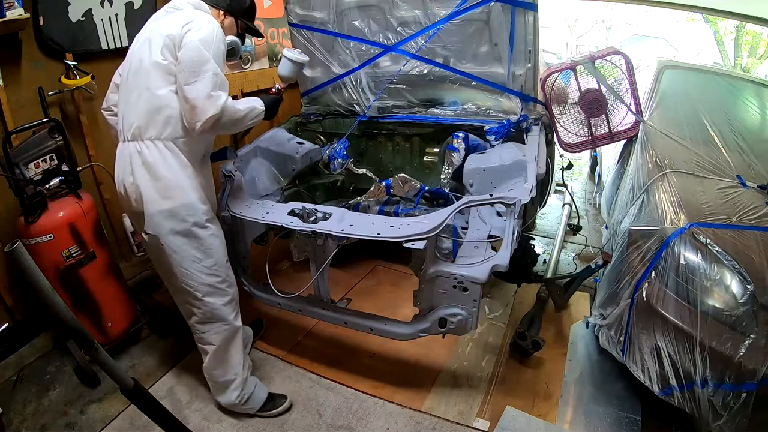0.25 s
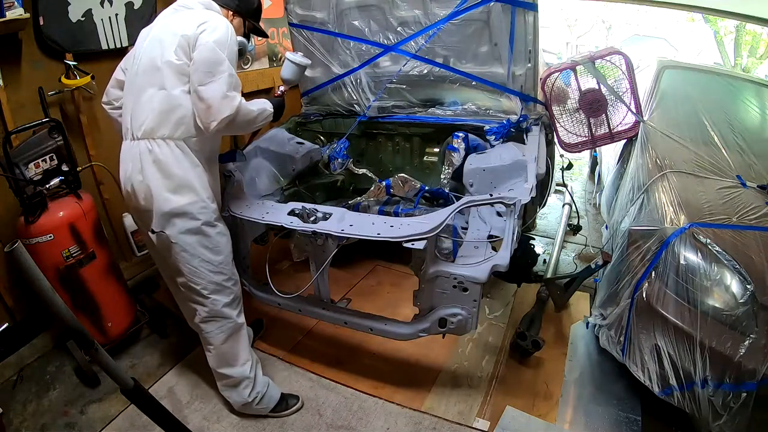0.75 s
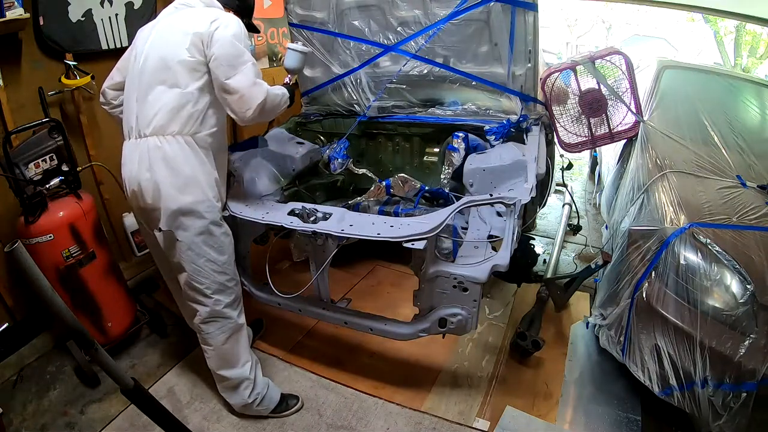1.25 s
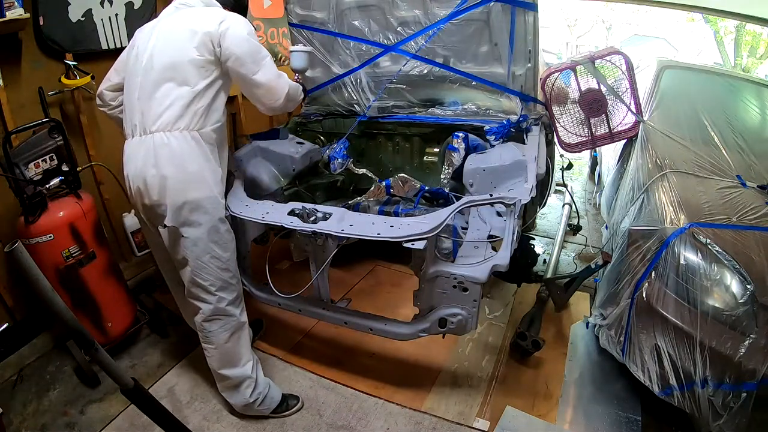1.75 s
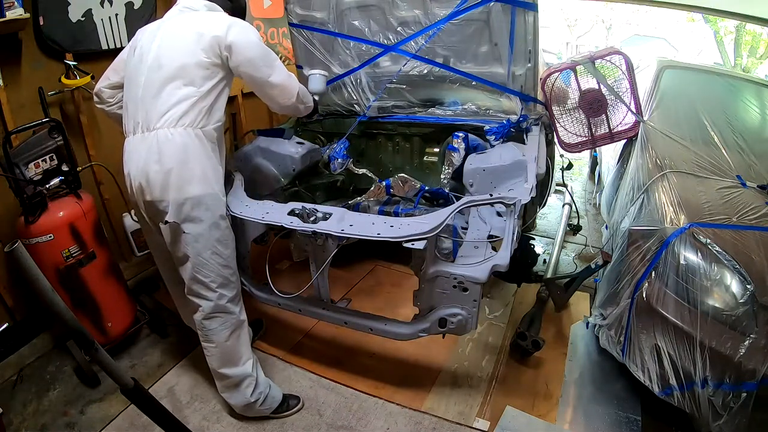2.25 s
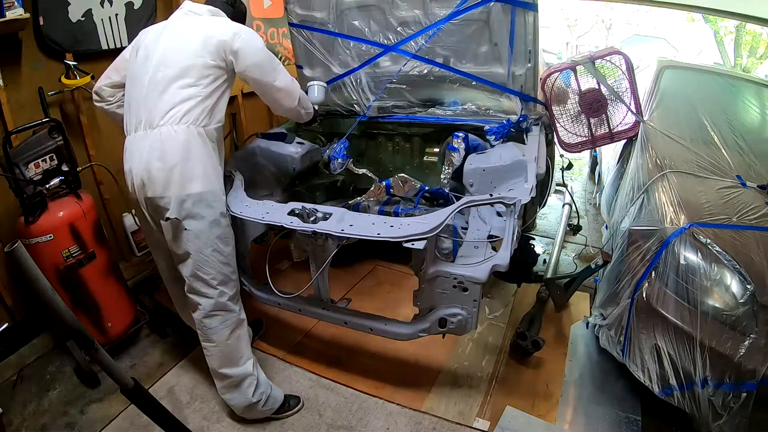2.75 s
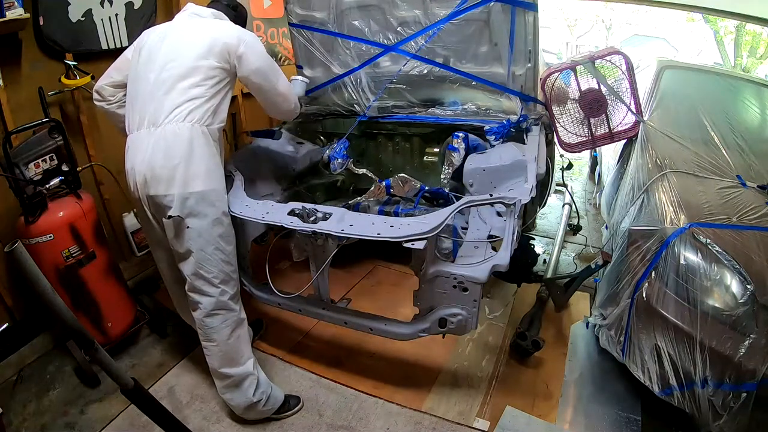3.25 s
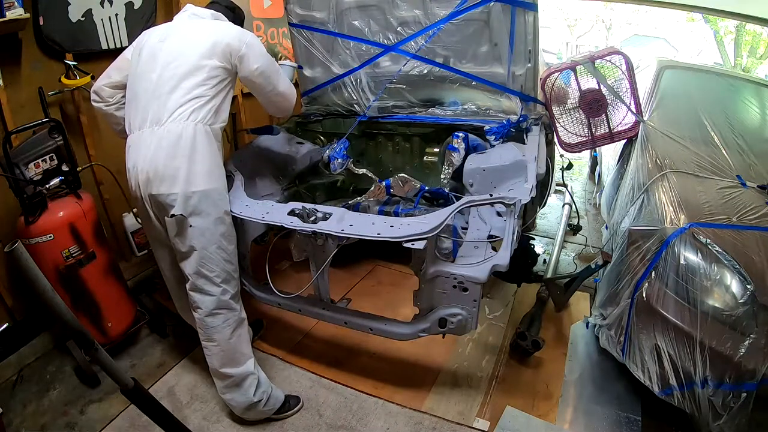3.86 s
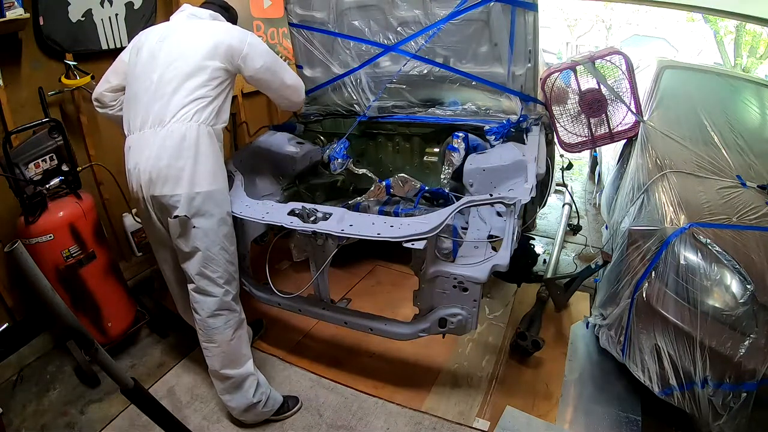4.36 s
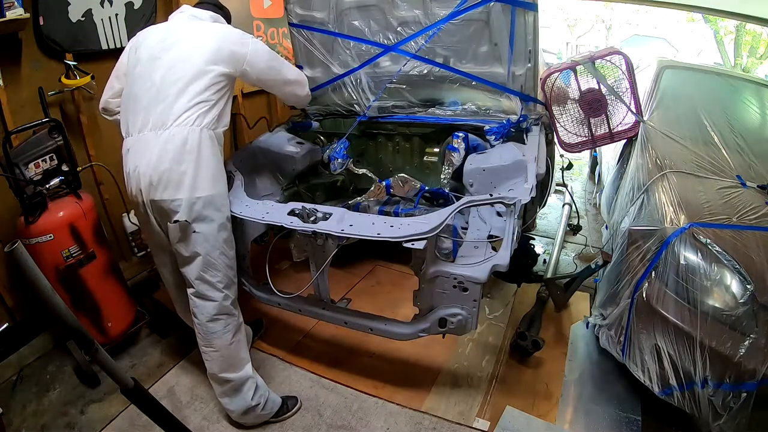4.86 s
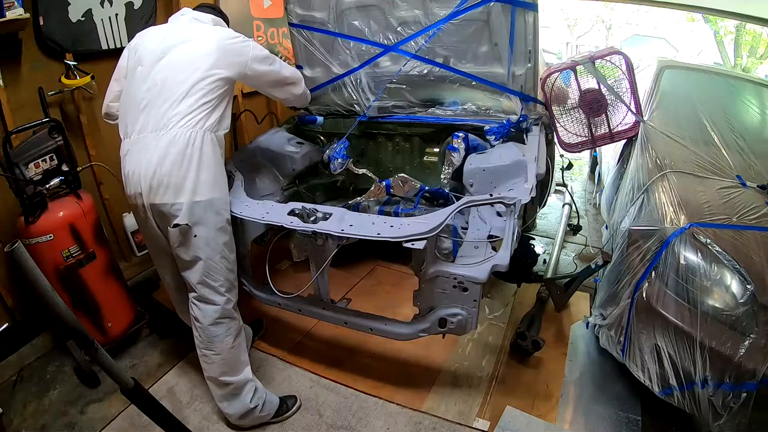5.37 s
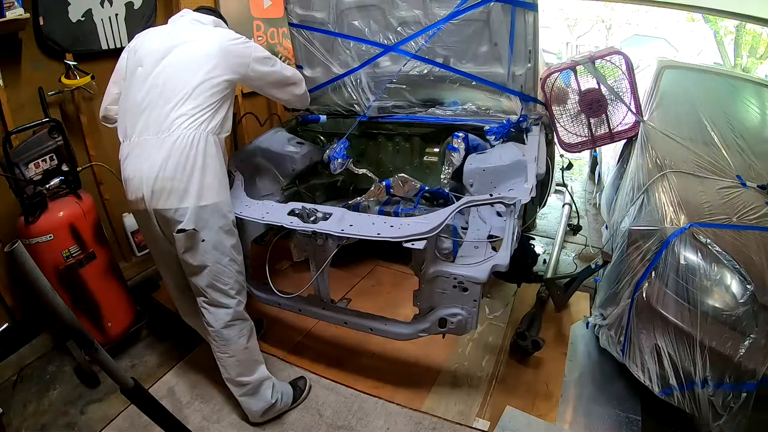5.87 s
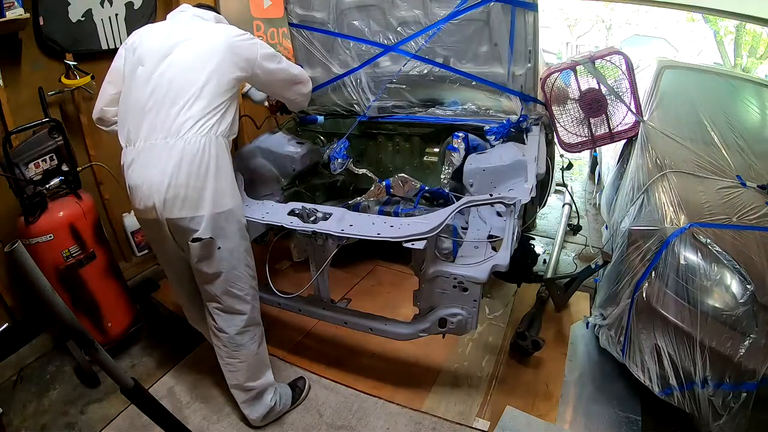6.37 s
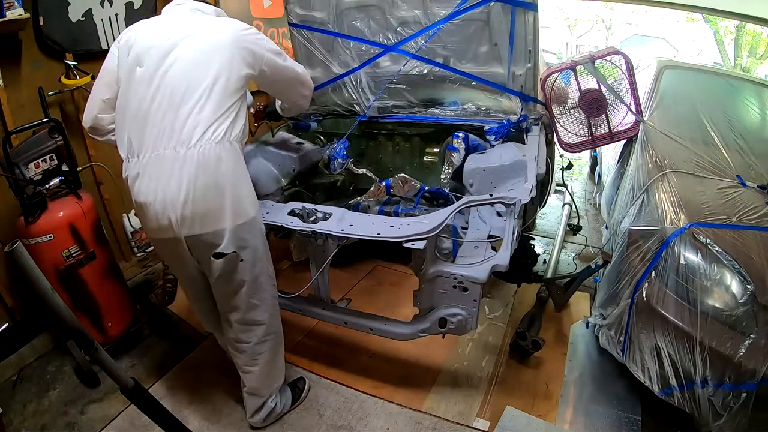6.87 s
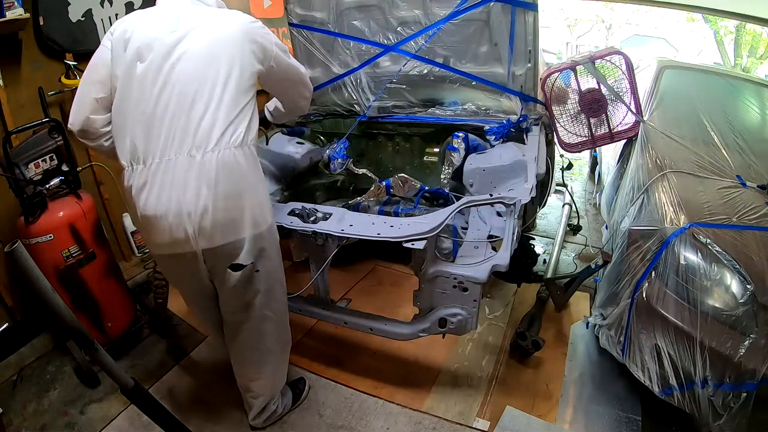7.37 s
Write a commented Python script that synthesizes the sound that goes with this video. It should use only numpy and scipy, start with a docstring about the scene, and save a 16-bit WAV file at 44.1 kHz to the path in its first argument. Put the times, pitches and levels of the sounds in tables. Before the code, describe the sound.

A small piston compressor drones loudly and steadily in a garage while a spray gun hisses in short bursts, ending with a sharp knock.

```python
"""A small piston compressor drones in a garage, 58 strokes a second: a sum of shaft orders and a valve-slap waveform.
Resonant bands rattle on each stroke; its cooling air is shaped noise. A painter leaning over a car shifts the
room's standing waves, screens the compressor and echoes it. His spray gun gives short bursts of turbulent noise.
Footfalls rock the microphone mount; a knock rings the microphone housing, and the sound breaks off."""
import sys
import numpy as np
from scipy import signal
from scipy.fft import rfft, irfft
from scipy.io import wavfile

SR = 44100
rng = np.random.default_rng(int(sys.argv[2]) if len(sys.argv) > 2 else 0)


def wav_record(signal):
    """Record a signal, one row per channel, as 16-bit PCM in the file named by sys.argv[1]."""
    frames = np.transpose(np.atleast_2d(signal))
    bounded = np.clip(frames, -1, 1)
    # unit amplitude maps onto the largest positive 16-bit level
    quanta = np.round(bounded * 32767).astype(np.int16)
    wavfile.write(sys.argv[1], SR, quanta)


N = 336038
TIME = np.arange(N) / SR
CUTOFF_HZ = 15500
SOUND_M_PER_S = 343

# strong multiples of the shaft speed: order, rms level/dB before the left-right lean and the painter
SHAFT_ORDERS = [(1, -24), (2, -31.5), (3, -27), (4, -26.5), (5, -35.5), (6, -29), (7, -35.5), (8, -39),
                (9, -25), (10, -21.5), (11, -27.5), (12, -31.5), (13, -29), (14, -34.5), (15, -35.5),
                (16, -37.5), (17, -43.5), (18, -50.5), (19, -47), (20, -54), (21, -55.5), (22, -42.5),
                (23, -42.5), (24, -42.5), (25, -47), (26, -43.5), (27, -58), (28, -47), (29, -56.5),
                (30, -60), (31, -39.5), (32, -46.5), (34, -44.5), (38, -43.5), (39, -41), (41, -53.5),
                (45, -48.5), (50, -54), (52, -68), (59, -52.5), (63, -53), (64, -52), (77, -54.5),
                (81, -53)]
# correlation of the compressor's sound at the two ears: f/Hz, correlation (-1 to 1)
EAR_CORRELATION = [(60, 0.89), (300, 1), (500, 1), (800, 0.53), (1200, 0.37), (3300, 0.78), (5500, 0.11),
                   (9000, -0.61), (15000, 0.041)]
STROKE_AT = .531   # point in each turn when the exhaust valve opens (turns)


def from_db(db):
    """A level in decibels is twenty times the logarithm of an amplitude ratio."""
    return 10 ** (np.asarray(db) / 20)


def rms_one(x):
    """Dividing by the root mean square gives unit effective value."""
    return x / np.sqrt(np.mean(x ** 2) + 1e-20)


def in_time(rows):
    """Linear interpolation turns each column of a time table into a curve, sample by sample."""
    s, *columns = np.transpose(rows)
    return [np.interp(TIME, s, column) for column in columns]


def at_hz(points, hz):
    """A spectrum is interpolated on a logarithmic frequency axis."""
    table_hz, values = np.array(points)[:, 0], np.array(points)[:, 1]
    return np.interp(np.log(np.maximum(hz, 1)), np.log(table_hz), values)


def ramp(start, length):
    """A linear transition rises from 0 to 1 (start and length in s)."""
    return np.clip((TIME - start) / length, 0, 1)


def drift(rate):
    """White noise through a two-pole low-pass at rate (Hz) wanders slowly, with spread 1."""
    step = 40   # samples per point of the slow signal
    pole = np.exp(-2 * np.pi * rate * step / SR)
    noise = rng.standard_normal(N // step + 2002)
    slow = signal.lfilter([1], [1, -2 * pole, pole * pole], noise)[2000:]   # without the onset
    return np.interp(np.arange(N) / step, np.arange(len(slow)), rms_one(slow))


def two_ears(mid, side, likeness):
    """Sum and difference of two uncorrelated signals give a prescribed interaural correlation."""
    alike = np.clip(likeness, -1, 1)
    mid = np.sqrt((1 + alike) / 2) * mid
    side = np.sqrt((1 - alike) / 2) * side
    return np.array([mid + side, mid - side])


def ear_gains(lean_db):
    """An interaural level difference is shared equally: half up on the left, half down on the right."""
    return from_db(np.outer([1, -1], lean_db) / 2)


def compressor_gains(hz):
    """The interaural level difference of the compressor varies with frequency."""
    # level difference between the ears: f/Hz, left minus right/dB
    level_difference = [(60, 1), (115, -.8), (230, 0), (350, .3), (520, .5), (600, 3.3), (1200, 5.5),
                        (1900, 4), (3300, 2.5), (5500, 0), (9000, -1), (15000, .5)]
    return ear_gains(at_hz(level_difference, hz))


def air_noise(spectrum, likeness):
    """Turbulence is random noise with a prescribed spectral density (dB per Hz) and interaural correlation."""
    # level difference of moving air between the ears: f/Hz, left minus right/dB
    air_difference = [(60, -2), (150, -1.5), (450, -2), (800, 3.5), (1300, 7.5), (3000, 3), (6000, 0),
                      (12000, 0)]
    hz = np.fft.rfftfreq(N, 1 / SR)
    ears = two_ears(*rfft(rng.standard_normal((2, N))), at_hz(likeness, hz))
    shaped = ears * ear_gains(at_hz(air_difference, hz)) * from_db(at_hz(spectrum, hz))
    return irfft(shaped, N) * np.sqrt(SR / 2)


def in_shadow():
    """Acoustic shadow: how fully the painter's body screens the compressor, 0-1."""
    enters_s, leaves_s, crossing_s = 4.15, 5.93, .32
    entering = ramp(enters_s - crossing_s / 2, crossing_s)
    leaving = ramp(leaves_s - crossing_s / 2, crossing_s)
    return entering - leaving


def body_echo():
    """Reflection with a changing path: strength (0-1) and delay (s) of the echo off the moving painter."""
    # the painter's moves: start t/s, end t/s, extra path at start/m, path change/(m/s)
    body_moves = [(2.4, 4.4, 3.1, -1.62), (5.3, 6.3, .44, .8)]
    strength, delay = np.zeros(N), np.zeros(N)
    for start, end, path_m, m_per_s in body_moves:
        strength += np.sin(np.pi * ramp(start, end - start) ** 2)
        extra_m = np.maximum(path_m + m_per_s * (TIME - start), 0)
        delay = np.where(TIME > start, extra_m / SOUND_M_PER_S, delay)
    return strength, delay


def shaft_turns():
    """Rotation is the integral of speed; motor slip behind the mains makes it hunt at twice the slip."""
    # compressor shaft speed before unevenness and hunting: t/s, speed/(turns per s)
    shaft_speed = [(0, 58.01), (1.2, 58.0), (4, 58.03), (7.4, 58.065)]
    mains_hz, hunt_turns = 60, .0013
    speed, = in_time(shaft_speed)
    turns = np.cumsum(speed) / SR + .0003 * drift(23)   # the shaft runs slightly unevenly
    return turns + hunt_turns * np.sin(2 * np.pi * 2 * (mains_hz * TIME - turns))


def drone(turns, waver, right_lag_s, count=16):
    """Fourier synthesis of the low orders: resonant phase lag spreads each stroke, standing waves shift them."""
    # resonances of room, tank and pump head that ring on after a stroke: f/Hz, width/Hz
    resonances = [(30, 311), (114.4, 12), (251, 12.4), (527, 40)]
    # orders on standing waves: order, gain fully bent/dB, gain in shadow/dB (both before
    # the swell is set to unit rms), body echo/dB
    standing_waves = [(5, -1.7, 1.6, -14), (6, 1.6, .4, -17), (7, 7, -.4, -17), (8, -.5, 1.9, -10),
                      (9, -.9, .9, -11), (10, .9, .3, -26), (11, -4, -4.2, -14), (12, -1.2, -2.4, -11),
                      (13, .5, -3.4, -18), (14, 1.3, 5.5, -12), (15, -1.6, -7.1, -12), (16, 0, 2.7, -13)]
    bend_from_s, bend_to_s = 1.8, 6.7   # the painter bends ever further over the car
    out, shaft_hz = np.zeros((2, N)), turns[-1] / TIME[-1]
    standing = {order: gains for order, *gains in standing_waves}
    bent, shadow = ramp(bend_from_s, bend_to_s - bend_from_s), in_shadow()
    moving, echo_s = body_echo()
    for k, (_, level_db) in enumerate(SHAFT_ORDERS[:count], 1):
        hz, height = k * shaft_hz, k / count
        lag = sum(2 * np.arctan2(width * hz, ring_hz ** 2 - hz ** 2) for ring_hz, width in resonances)
        bent_db, shadow_db, echo_db = standing.get(k, (0, 0, -np.inf))   # the longest waves pass him by
        swell = rms_one(from_db(bent_db * bent + shadow_db * shadow))
        angle = 2 * np.pi * k * (turns - STROKE_AT) - lag + waver * height * drift(0.46)
        # short waves go the long way round the painter to the right ear
        detour_angle = np.pi * hz * right_lag_s * (1 + shadow / 2) * height ** 2
        between_ears = detour_angle + waver * height / 2 * drift(0.99)
        angle = angle + np.outer([1, -1], between_ears)
        echo = from_db(echo_db) * moving * np.cos(angle - 2 * np.pi * hz * echo_s)
        wave = np.cos(angle) + echo
        out += np.sqrt(2) * from_db(level_db) * swell * compressor_gains(hz) * wave
    return out


def buzz(turns, shifting, scatter_hz, count=16, size=4096):
    """A periodic valve slap has high harmonics; diffuse scattering randomizes their phase toward the treble."""
    # weaker orders, each then varied at random by 4 dB: f/Hz, rms level of one order/dB
    weak_orders = [(1900, -53.5), (2500, -60), (3600, -62.5), (5000, -67), (6300, -71.5), (7250, -67),
                   (8300, -77.5), (9250, -61), (10300, -73), (11000, -92.5)]
    orders = np.arange(size // 2 + 1)
    hz = orders * turns[-1] / TIME[-1]
    level_db = at_hz(weak_orders, hz) + rng.normal(0, 4.0, len(hz))
    for order, db in SHAFT_ORDERS:
        level_db[round(order)] = db
    in_band = (orders > count) * (hz < CUTOFF_HZ)
    spectrum = from_db(level_db) * compressor_gains(hz) * in_band * size / np.sqrt(2)
    apart = np.arccos(np.clip(at_hz(EAR_CORRELATION, hz), -1, 1))   # phase between the ears
    out = np.zeros((2, N))
    # the direct slap, and three diffuse echoes that come and go slowly
    paths = [(0.9, (hz / scatter_hz) ** 2)] + [(shifting * drift(2.2), np.pi) for _ in range(3)]
    for weight, scatter in paths:
        angle = scatter * rng.standard_normal(len(hz)) - 2 * np.pi * orders * STROKE_AT
        ears = np.outer([.5, -.5], apart * rng.choice([-1, 1], len(hz)))
        cycles = irfft(spectrum * np.exp(1j * (angle + ears)))
        # one stored cycle per ear is read at the shaft's position
        out += weight * np.array([np.interp(turns % 1 * size, np.arange(size), c) for c in cycles])
    return out / np.sqrt(1 + 3 * shifting ** 2)


def band_pass(x, hz, width):
    """A first-order resonant band passes its centre unchanged."""
    band = signal.butter(1, [hz - width / 2, hz + width / 2], "band", fs=SR, output="sos")
    return signal.sosfilt(band, x)


def rattle(turns, throb, uneven_db, flutter_db):
    """Forced resonance: stroke-pulsed noise rings valve reeds and housing in narrow bands, harder in fits."""
    # valve and housing bands: f/Hz, width/Hz, rms level/dB before rest trim, fits and lean, ear correlation
    rattle_bands = [(1850, 120, -48, 0.39), (2065, 174, -42.5, 0.87), (7230, 170, -51, -0.64),
                    (9100, 210, -50.5, -0.17), (9430, 490, -51, -0.21)]
    # fits of rattling: t/s, half length to 1/e/s, rise toward the low bands/dB, rise of the top band/dB
    rattle_fits = [(4.07, 0.073, -1, 5.5), (6.148, .07, 6, 5), (7.143, 0.14, 0.5, 11.5)]
    rest_db = -2.1   # trim of the top band, less for lower ones
    out = np.zeros((2, N))
    pulse = 1 + throb * np.cos(2 * np.pi * (turns - .88))
    shake = rms_one(pulse * from_db(uneven_db * drift(45)))
    for hz, width, level_db, likeness in rattle_bands:
        height = hz / rattle_bands[-1][0]
        flutter = from_db(flutter_db * height * drift(13))
        kicks = shake * flutter * two_ears(*rng.standard_normal((2, N)), likeness)
        ringing = rms_one(band_pass(band_pass(kicks, hz, width), hz, width))
        fits_db = sum((low_db + (high_db - low_db) * height ** 2) * np.exp(-((TIME - s) / length) ** 2)
                      for s, length, low_db, high_db in rattle_fits)
        out += from_db(level_db + rest_db * height + fits_db) * compressor_gains(hz) * ringing
    return out


def rush(turns, throb):
    """Amplitude modulation: the turbulence of cooling and intake air pulses with the piston."""
    # spectral density before ear lean and pulsing: f/Hz, level/dB per Hz
    cooling_air = [(30, -70.5), (100, -65.5), (300, -68.5), (550, -64), (800, -67), (1100, -72.5),
                   (1700, -70.5), (2500, -78.5), (3700, -78), (5000, -82), (6000, -86), (9500, -85),
                   (10800, -100), (11900, -94), (13200, -104), (15500, -108)]
    return air_noise(cooling_air, EAR_CORRELATION) * (1 + throb * np.cos(2 * np.pi * (turns - .6)))


def round_painter(x):
    """Interference: waves passing either side of the body add up in one band and cancel in the next."""
    # bands the detour lifts or cancels: f/Hz, width/Hz, gain in full shadow/dB
    detour_bands = [(1010, 125, 4.5), (1450, 280, -2.5)]
    shadow = in_shadow()
    out = x
    for hz, width, gain_db in detour_bands:
        out = out + (from_db(gain_db * shadow) - 1) * band_pass(x, hz, width)
    return out


def near_echo(x, low_hz, left_s, right_s):
    """Reflection: a small surface returns only short waves, later to one ear than to the other."""
    # a surface nearing the microphone: t/s, echo level/dB
    nearing_surface = [(6.7, -34), (7.05, -20), (7.3, -11), (7.53, -8)]
    bright = signal.sosfilt(signal.butter(2, [low_hz, 5000], "band", fs=SR, output="sos"), x)
    late = [np.interp(TIME - delay, TIME, ear) for delay, ear in zip((left_s, right_s), bright)]
    return from_db(in_time(nearing_surface)[0]) * np.array(late)


def spray_gun(flutter_db, likeness):
    """Jet noise: stored pressure spits out as the trigger opens, then the jet settles to a smooth hiss."""
    # spectral density before the trigger gains: f/Hz, level/dB per Hz
    jet_spectrum = [(1000, -90), (3000, -83), (5000, -82.5), (7000, -78), (9000, -81.5), (11500, -84.5),
                    (13000, -90), (15000, -100)]
    # trigger pulls: opens t/s, closes t/s, initial jet gain/dB, opening spit gain/dB
    trigger_pulls = [(-.5, .23, -4.5, 4), (0.498, 1.79, -2, 4.5), (4.789, 5.55, -8.5, 3)]
    open_s, spit_s = 0.038, 0.076   # valve opening time, decay time of the spit
    regain_db_per_s, release_db_per_s = 2.4, 170   # jet regains pressure, hiss fades once shut
    air = np.zeros(N)
    for opens, closes, jet_db, spit_db in trigger_pulls:
        age = np.clip(TIME - opens - open_s, 0, closes - opens)
        valve = ramp(opens, open_s) * from_db(-release_db_per_s * np.maximum(TIME - closes, 0))
        jet = from_db(jet_db + regain_db_per_s * age)
        spit = from_db(spit_db) * np.exp(-age / spit_s)
        air += valve * (jet + spit)
    return air_noise(jet_spectrum, [(1000, likeness)]) * air * from_db(flutter_db * drift(22))


def footfalls(mount_hz):
    """Structure-borne shock: each step through the floor rocks the microphone mount at its own low note."""
    # footfalls: t/s, peak level/dB, half length to 1/e/s
    floor_steps = [(4.0, -33, .05), (6.36, -37, .055), (6.95, -35, .06), (7.51, -14, .055)]
    rocking = sum(from_db(db) * np.exp(-((TIME - s) / length) ** 2) for s, db, length in floor_steps)
    ear_phase = np.array([[0], [1]])   # radians
    return rocking * np.sin(2 * np.pi * mount_hz * TIME + ear_phase)


def knock():
    """Damped modes: the struck housing flexes, pushing the two microphones in opposite directions."""
    # modes of the housing: f/Hz, starting level/dB, 60 dB decay time/s, right amplitude relative to left
    housing_modes = [(1040, 15, 0.0037, -0.36), (132, 10, 0.039, -0.19), (3300, -21, .003, -0.4)]
    age = np.maximum(TIME - 7.5344, 0)   # s since the knock
    out = np.zeros((2, N))
    for hz, db, t60, right in housing_modes:
        mode = from_db(db - 60 * np.minimum(age / t60, 2)) * np.sin(2 * np.pi * hz * age)
        out += np.outer([1, right], mode)
    return out


def scene():
    """Superposition: the compressor across the garage, the spray gun, and bumps on the microphone."""
    turns = shaft_turns()
    compressor = drone(turns, waver=0.44, right_lag_s=0.00029)
    compressor += round_painter(buzz(turns, shifting=0.22, scatter_hz=1105))
    compressor += rattle(turns, throb=.4, uneven_db=1.5, flutter_db=2.0)
    compressor += rush(turns, throb=0.16)
    compressor += near_echo(compressor, low_hz=1190, left_s=0.00089, right_s=0.00094)
    return compressor + spray_gun(flutter_db=-0.1, likeness=0.16) + footfalls(mount_hz=27.9) + knock()


def record(dry):
    """Clipping and band limiting: the level drops, then silence; peaks are clipped and the top is cut."""
    drop_at_s, drop_s, drop_db, silent_at_s = 7.535, 0.0073, -17, 7.572
    fade = from_db(drop_db * ramp(drop_at_s, drop_s)) * (1 - ramp(silent_at_s, .002))
    sound = np.clip(dry * fade, -1, 1)
    return signal.sosfilt(signal.ellip(10, .2, 80, CUTOFF_HZ, fs=SR, output="sos"), sound)


dry = scene()
out = record(dry)
wav_record(out)
```